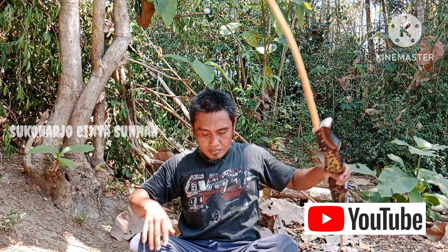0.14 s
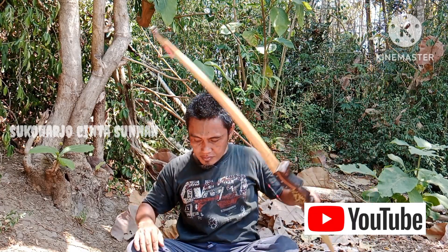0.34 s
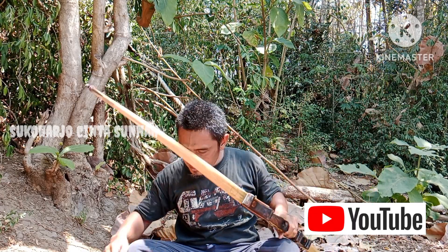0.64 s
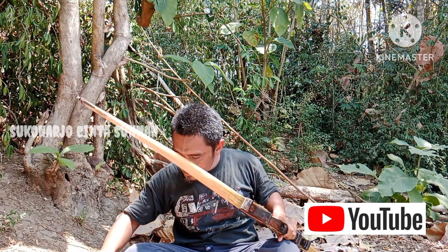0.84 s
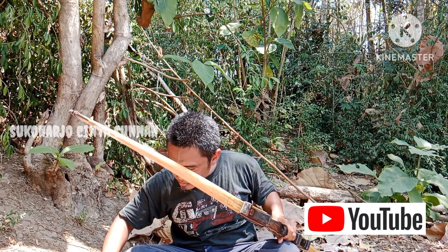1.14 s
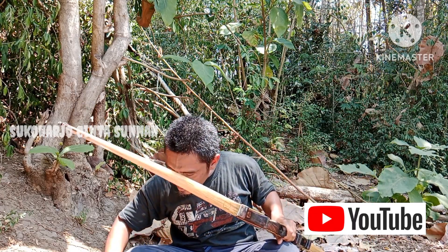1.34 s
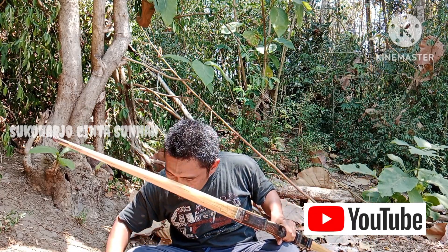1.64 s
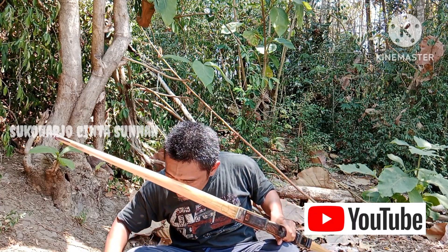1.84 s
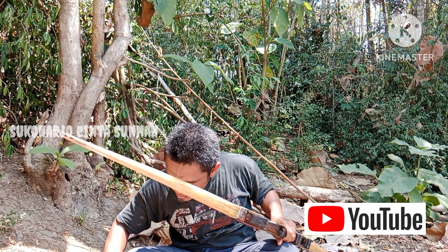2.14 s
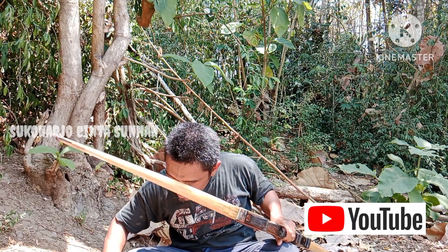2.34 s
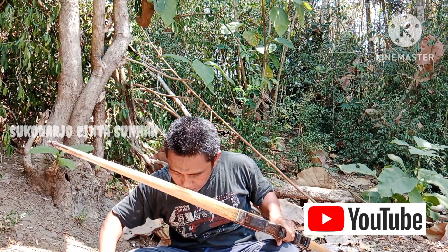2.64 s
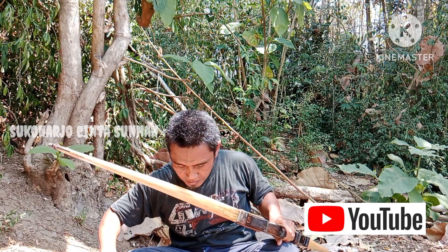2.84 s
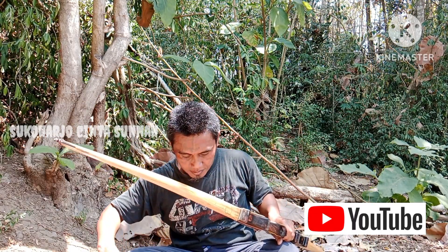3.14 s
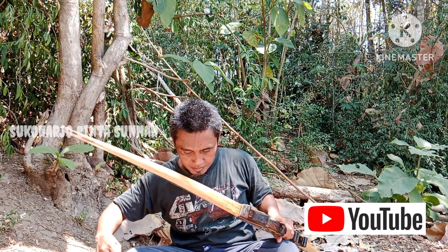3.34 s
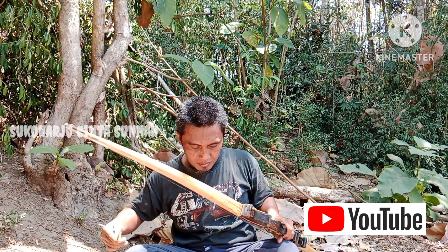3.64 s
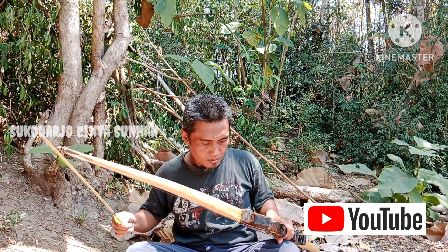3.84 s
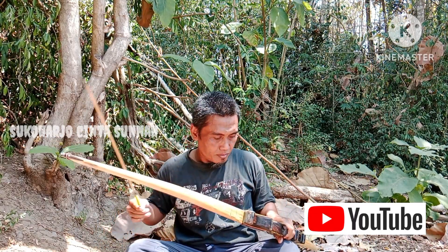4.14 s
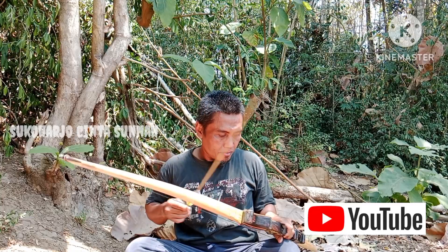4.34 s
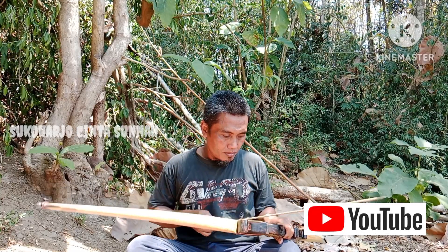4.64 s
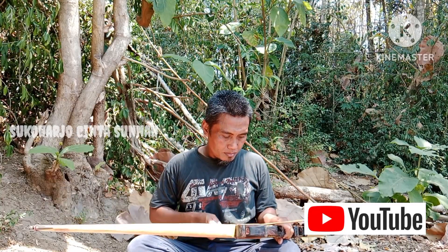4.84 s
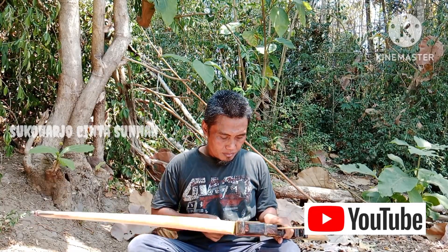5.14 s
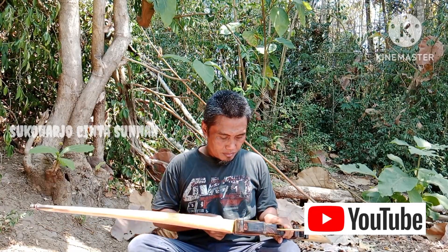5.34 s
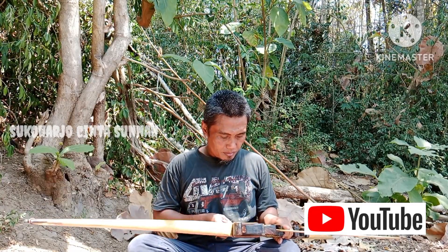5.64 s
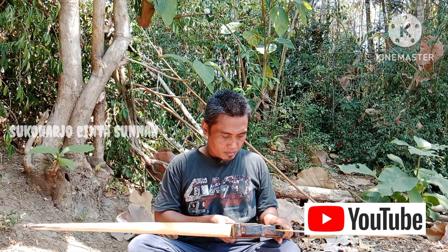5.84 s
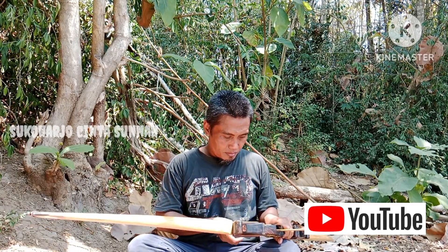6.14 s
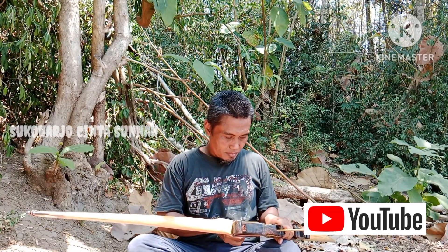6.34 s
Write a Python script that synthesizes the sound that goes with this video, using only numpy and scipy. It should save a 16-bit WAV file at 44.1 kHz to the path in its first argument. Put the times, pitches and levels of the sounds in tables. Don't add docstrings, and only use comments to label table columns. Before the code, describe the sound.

In a quiet grove, an insect chirps faintly, small far taps tick and thin birds whistle. Close by, a hand rummages in dry leaves with twig clicks and soft wood knocks. A bowstring then slaps the limb in one sharp, loud crack, leaving a faint buzz. Arrow wood taps brightly along the bow, while low wind bumps the small phone microphone.

```python
import sys
import numpy as np
from scipy import signal
from scipy.fft import rfft, irfft, next_fast_len
from scipy.io import wavfile
from scipy.ndimage import uniform_filter1d, map_coordinates

SR = 44100
rng = np.random.default_rng(int(sys.argv[2]) if len(sys.argv) > 2 else 0)


def to_linear_factor(level_db):
    exponent = np.asarray(level_db, float) / 20
    return 10 ** exponent


def generate_wav(signal):
    frames = np.transpose(np.atleast_2d(signal))
    scaled = np.clip(frames, -1, 1) * 32767
    pcm = np.round(scaled).astype(np.int16)
    wavfile.write(sys.argv[1], SR, pcm)


N = 286650


def unit(x):
    return x / np.sqrt(np.mean(x ** 2) + 1e-20)


def along(points, hz):
    f, v = np.transpose(points)
    return np.interp(np.log(hz + 1), np.log(f + 1), v)


def wobble(rate, size=N):
    knots = rng.standard_normal(int(size * max(rate, 300) / SR) + 4)
    return map_coordinates(knots, [np.arange(size) * rate / SR])


def coloured(x, spectrum):
    m = next_fast_len(len(x) + 4096)
    gain = to_linear_factor(along(spectrum, np.fft.rfftfreq(m, 1 / SR)))
    return unit(irfft(rfft(x, m) * gain, m)[:len(x)])


def band(x, edges, order=4):
    return signal.sosfilt(signal.butter(order, edges, "band", fs=SR, output="sos"), x)


def add(track, s, sound):
    part = track[round(s * SR):][:len(sound)]
    part += sound[:len(part)]


def swells(rows):
    s, db, rise, fade = np.array(list(rows)).T[:, :, None]
    t = np.arange(0, N / SR, .001)
    fall = np.maximum((s - t) / abs(rise), (t - s) / abs(fade))
    power = to_linear_factor(db - 20 * fall) ** 2
    return np.interp(np.arange(N) / SR, t, np.sqrt(power.sum(axis=0)))


# pitch_hz [Hz], t60_s [s]
GROVE_ECHO = [(500, 0.57), (2000, 0.15), (5000, 0.087), (9000, 0.36), (12500, 0.47)]


def echoes(x):
    hz, t, grid = signal.stft(rng.standard_normal(size=12000), SR, nperseg=256)
    fading = to_linear_factor(-60 * t / along(GROVE_ECHO, hz)[:, None])
    tail = signal.istft(grid * fading, SR, nperseg=256)[1]
    return signal.fftconvolve(x, tail / np.linalg.norm(tail))


# pitch_hz [Hz], level_db [dB]
CRACK_COLOUR = [(350, -64.5), (700, -18), (1400, -12), (2100, -2.5), (3500, 0), (5500, -4.5), (8500, -3.5),
                (10500, -16.5), (15500, -38.5)]


def blow(modes, crack_db, crack_t60, wet_db, rise=0.000575, colour=CRACK_COLOUR):
    t = np.arange(SR // 8) / SR
    hz, width, db = np.transpose(modes)[:, :, None]
    width = np.clip(width, 22, 900)
    strength = width * to_linear_factor(db + 1.5 * rng.standard_normal(hz.shape))
    high = np.minimum(hz / 3500, 1) ** 2
    strength = strength * (1 + 0.64 * high * np.exp(-t / 0.002))
    knots = rng.standard_normal((len(hz), 32))
    knot_times = np.linspace(0, t[-1], 32)
    flutter = 0.38 * high * np.array([np.interp(t, knot_times, row) for row in knots])
    decay = np.exp(-np.pi * width * t + flutter)
    ring = np.sum(strength * decay * np.sin(2 * np.pi * hz * t), axis=0)
    crack = to_linear_factor(crack_db - 60 * t / crack_t60) * coloured(rng.standard_normal(len(t)), colour)
    direct = (ring / np.abs(ring).max() + crack) * (1 - np.exp(-t / rise))
    out = to_linear_factor(wet_db) * echoes(direct)
    add(out, 0, direct)
    return out


def scuff(t60, colour):
    t = np.arange(SR // 4) / SR
    spectrum = rfft(coloured(rng.standard_normal(len(t)), colour))
    streak_db = 8 * np.minimum(wobble(SR / 40, len(spectrum)), 1)
    return to_linear_factor(-60 * t / t60) * unit(irfft(spectrum * to_linear_factor(streak_db), len(t)))


# pitch_hz [Hz], level_db [dB per Hz]
HUSH_COLOUR = [(88, -28.5), (150, -1), (341, -10.5), (1450, -18.5), (2140, -23), (5150, -28.5),
               (7320, -34.5), (8230, -28), (10200, -42.5), (15300, -43.5), (16000, -62.5)]
# pitch_hz [Hz], level_db [dB]
DEEP_COLOUR = [(25, -28.5), (42, -4.5), (60, 3.5), (85, 0.5), (120, -25)]
# pitch_hz [Hz], level_db [dB]
UPPER_COLOUR = [(60, -29), (95, 1.5), (140, -4), (200, -17), (350, -38.5)]
# peak_s [s], deep_db [dB], upper_db [dB], fade_s [s over 20 dB], signs ignored
GUST_EVENTS = [(0.056, -46.5, -70, -0.05), (0.271, -54, -64, -0.5), (0.38, -56.5, -71.5, 0.23),
               (0.426, -39.5, -54.5, -0.005), (1.0, -69, -73.5, 0.62), (1.38, -59.5, -66.5, 0.18),
               (1.655, -54.5, -75.5, 0.0438), (1.8, -67.5, -66, 0.09), (2.045, -38, -45.5, 0.0195),
               (2.3, -66.5, -58, 0.1), (2.418, -43.5, -52, 0.0512), (2.59, -83, -61.5, 0.47),
               (2.885, -47.5, -63.5, 0.04), (3.161, -44, -46.5, 0.1649), (3.205, -58, -67, -0.1157),
               (3.7, -62.5, -60.5, 0.14), (3.9, -87.5, -61.5, 0.625), (4.76, -53, -68.5, 0.1566),
               (4.88, -56.5, -58, 0.2248), (5.11, -50, -51, 0.2066), (5.16, -51, -68, 0.1051),
               (5.36, -48.5, -53.5, 0.047), (5.469, -48.5, -60.5, 0.0753), (5.58, -51, -65.5, 0.12),
               (5.702, -39, -42.5, 0.0615), (5.88, -49, -52.5, 0.14), (5.959, -50, -50.5, 0.1034),
               (6.045, -48, -61, 0.13), (6.186, -41.5, -47, 0.03), (6.415, -44, -74.5, 0.0647)]
# start_s [s], peak_db [dB]
SNAP_EVENTS = [
    (3.9243, -26),
    (3.9262, -15),
    (3.9304, -8),
]


def wind():
    s, deep_db, upper_db, fade = np.transpose(GUST_EVENTS)
    rise = 0.6803 * fade
    since = np.arange(N) / SR - SNAP_EVENTS[-1][0]
    duck_db = -12 * (since > 0) * np.exp(-(since / 0.59) ** 2)

    def level(db, calm_db):
        calm = to_linear_factor(calm_db + duck_db + 3.5 * wobble(6.4))
        return np.hypot(swells(zip(s, db, rise, fade)), calm)

    def eddies(spectrum):
        noise = coloured(rng.standard_normal(N), spectrum)
        return np.cos(np.angle(signal.hilbert(noise)))

    buffet = to_linear_factor(7) * level(deep_db, calm_db=-77) * eddies(DEEP_COLOUR)
    buffet += to_linear_factor(2.5) * level(upper_db, calm_db=-71) * eddies(UPPER_COLOUR)
    breeze_db = .5 * wobble(3) + .5 * wobble(15)
    hush = to_linear_factor(-71 + breeze_db) * coloured(rng.standard_normal(N), HUSH_COLOUR)
    return band(buffet, (38, 172.75), order=3) + hush


# start_s [s], peak_db [dB], length_s [s], pitch_hz [Hz]
INSECT_CHIRPS = [(0.0054, -67, 0.0277, 3440), (0.0164, -62.5, 0.0133, 3468), (0.051, -69, 0.0246, 3450),
                 (0.097, -68.5, 0.0148, 3406), (0.1766, -58.5, 0.0069, 3426), (0.2025, -54.5, 0.0038, 3429),
                 (0.23, -58, 0.0148, 3382), (0.274, -72.5, 0.02, 3460), (0.3024, -64.5, 0.0116, 3414),
                 (0.387, -54.5, 0.0075, 3425), (0.411, -57.5, 0.0063, 3444), (0.423, -65.5, 0.0107, 3307),
                 (0.4718, -70, 0.0175, 3492)]


def insect():
    out, t = np.zeros(N), np.arange(SR // 10) / SR
    for s, db, length, hz in INSECT_CHIRPS:
        fade_db = -60 * np.clip(t - length, 0, None) / 0.045
        swell = np.clip(t / 0.0023, 0, 1) * to_linear_factor(fade_db)
        add(out, s - .002, to_linear_factor(db) * swell * np.sin(2 * np.pi * hz * t))
    return out


def note(s, first_hz, last_hz, db, length):
    attack_s, release_s = .008, 0.0477
    end = s + length
    return [(s - attack_s, first_hz, db - 20), (s, first_hz, db),
            (end, last_hz, db), (end + release_s, last_hz, db - 20)]


def whistle(rows, smear_hz, waver_hz):
    s, hz, db = np.transpose(rows)
    t = np.arange(s[0], s[-1], 1 / SR)
    size = len(t) // 4096 * 4096 + 4096

    def chance(rate):
        return wobble(rate, size)[:len(t)]

    echo = 0.516 + chance(smear_hz) + 1j * chance(smear_hz)
    turns = np.cumsum(np.interp(t, s, hz) + waver_hz * chance(24.25)) / SR
    return s[0], to_linear_factor(np.interp(t, s, db)) * np.real(echo * np.exp(2j * np.pi * turns))


# start_s [s], first_pitch_hz [Hz], last_pitch_hz [Hz], level_db [dB], length_s [s]
BIRD_NOTES = [(0.099, 2486, 2445, -72, 0.084), (0.169, 2389, 2300, -71, 0.109),
              (0.188, 7317, 7450, -77, 0.204), (0.193, 4190, 4267, -73, 0.055),
              (0.249, 1924, 1925, -74, 0.188), (0.286, 1271, 1260, -76, 0.037),
              (0.299, 1489, 1398, -73.5, 0.0178), (0.335, 1486, 1523, -70.5, 0.044),
              (0.419, 2650, 2617, -74.5, 0.0256), (0.431, 3000, 2950, -78.5, 0.05),
              (0.323, 2375, 2404, -72.5, 0.129), (0.384, 8540, 8400, -75, 0.038),
              (0.461, 1620, 1540, -69, 0.0381), (.53, 1560, 1535, -78.5, 0.054),
              (0.999, 3400, 3250, -78, .03), (1.035, 3154, 3040, -74, 0.0402),
              (1.154, 2680, 2734, -57.5, 0.034), (1.178, 2818, 2900, -62.5, 0.051),
              (1.25, 2774, 2795, -59, 0.044), (1.293, 2967, 2900, -55, 0.0453),
              (1.31, 2670, 2580, -63, 0.0172), (1.359, 2900, 2900, -62, 0.0652),
              (1.467, 2900, 2900, -73, 0.013), (4.739, 2052, 1911, -69.5, 0.093),
              (4.749, 1650, 1700, -72, 0.078), (4.866, 1757, 1770, -68, 0.0246),
              (6.22, 2878, 3250, -70, 0.0495), (6.373, 2676, 2640, -61, 0.00695),
              (6.397, 2651, 2790, -59.5, 0.0258), (6.49, 2690, 2760, -66.5, 0.0101)]
# start_s [s], level_db [dB], length_s [s]
COO_NOTES = [
    (0.991, -71, 0.04),
    (1.09, -81.5, 0.026),
    (1.161, -76.5, 0.043),
    (1.482, -78, 0.0345),
    (2.075, -70.5, 0.0496),
    (2.18, -70, 0.025),
    (2.484, -77.5, 0.01474),
    (2.72, -71.5, 0.0353),
    (2.98, -77.5, 0.022),
]


def birds():
    out = np.zeros(N)
    for row in BIRD_NOTES:
        add(out, *whistle(note(*row), smear_hz=210, waver_hz=40))
    for s, db, length in COO_NOTES:
        add(out, *whistle(note(s, 1465, 1465, db, length), smear_hz=79.9, waver_hz=14.4))
    return 0.698 * out


# start_s [s], peak_db [dB]
TICK_EVENTS = [
    (0.099, -54.5),
    (0.239, -53),
    (0.4239, -53),
    (0.615, -57),
    (0.6997, -63),
    (0.857, -57),
    (0.998, -58.5),
    (1.245, -56),
    (1.3925, -58),
    (1.6484, -56),
]
# pitch_hz [Hz], width_hz [Hz], level_db [dB]
TICK_MODES = [(5634.2, 14, -1), (5940, 184, -12.5), (6655, 29, 1.5), (8100, 27, -27), (8000, 78, -16)]


def far_ticks():
    out = np.zeros(N)
    for s, db in TICK_EVENTS:
        add(out, s, to_linear_factor(db) * blow(TICK_MODES, crack_db=-14.5, crack_t60=0.07, wet_db=-9))
    return out


def crackle(count):
    start, pitch, size = rng.random((count, 3)).T
    t = np.arange(800) / SR
    hz = 2000 * 7 ** pitch[:, None]
    loudness = to_linear_factor(-2.5 * np.log(size + 0.03))[:, None]
    rings = loudness * np.sin(2 * np.pi * hz * t) * to_linear_factor(-60 * t / .07)
    where = (start * N).astype(int)[:, None] + np.arange(len(t))
    return unit(np.bincount(where.ravel(), rings.ravel())[:N])


# pitch_hz [Hz], level_db [dB]
LEAF_COLOUR = [(880, -41.5), (1500, -6.5), (2060, -8), (2230, -14), (3060, -2.5), (5330, -3), (7100, 3),
               (10500, -10), (14800, -21), (16000, -15.5)]
# peak_s [s], level_db [dB], rise_s [s over 20 dB], fade_s [s over 20 dB], signs ignored
RUMMAGE_EVENTS = [(1.564, -71.5, -0.1954, 0.12), (1.745, -67.5, 0.0154, 0.0748), (1.826, -55, 0.02, 0.0857),
                  (1.85, -52, 0.0216, .07), (1.905, -58.5, 0.0891, 0.0356), (1.97, -67, -0.17, 0.0873),
                  (2.17, -74.5, 0.1, -0.14), (2.422, -66, 0.0538, -0.104), (3.01, -85, 0.17, 0.1),
                  (3.095, -86, 0.19, -0.02), (3.275, -82.5, -0.1954, 0.26), (3.456, -80, -0.33, 0.29),
                  (4.04, -82.5, 0.1485, -0.0745), (4.275, -79, 0.12, -0.42), (4.4, -83.5, 0.12, 0.1),
                  (4.55, -78.5, -0.1635, 0.1588), (4.65, -74, 0.23, 0.26), (4.76, -74, 0.01, 0.19),
                  (4.885, -63.5, 0.0626, -0.1071), (4.96, -74.5, 0.06, 0.0346), (5.04, -81, 0.25, 0.16),
                  (6.24, -82.5, 0.79, -1.5), (6.325, -81.5, 0.44, -3.3)]
# peak_s [s], level_db [dB], rise_s [s over 20 dB], fade_s
# [s over 20 dB], signs ignored
DRAG_EVENTS = [
    (1.868, -53, 0.0911, 0.0845),
    (1.998, -54.5, 0.0034, 0.012),
    (2.018, -49, 0.0376, 0.0069),
    (2.23, -48.5, 0.0137, 0.0418),
    (2.4, -70, -0.06, 0.0741),
    (3.948, -53, 0.0933, -0.0407),
]
# pitch_hz [Hz], level_db [dB]
DRAG_COLOUR = [(400, -14), (600, -11), (730, 4.5), (900, -20), (1250, -4), (1700, -16), (2600, -17),
               (4000, -32)]
# start_s [s], peak_db [dB], pitch_hz [Hz]
TWIG_CLICKS = [(1.5593, -46.5, 5280), (1.793, -51.5, 4700), (1.8214, -44.5, 6450), (1.8313, -33, 3146),
               (1.8447, -31, 3104), (1.902, -38.5, 2684), (1.9671, -35, 7850), (2.02, -41.5, 2580),
               (2.029, -44.5, 3238), (2.114, -52, 3335), (2.4307, -43.5, 8180), (2.617, -50.5, 5114),
               (3.2662, -61, 8470), (3.3587, -53.5, 3500), (3.4535, -52.5, 8590), (4.264, -52.5, 8513),
               (4.538, -60.5, 8747), (4.5971, -49.5, 4255)]


def leaves():
    grains = coloured(crackle(count=5000) + .95 * rng.standard_normal(N), LEAF_COLOUR)
    out = swells(RUMMAGE_EVENTS) * grains
    scrape = coloured(rng.standard_normal(N) * to_linear_factor(1.7 * wobble(70)), DRAG_COLOUR)
    out += swells(DRAG_EVENTS) * scrape
    for s, db, hz in TWIG_CLICKS:
        modes = [(hz, 300, 0), (min(hz * 1.529, 9500), 400, -6)]
        click = blow(modes, crack_db=-12.5, crack_t60=0.00693, wet_db=-9, colour=LEAF_COLOUR)
        add(out, s, to_linear_factor(db) * click)
    return out


# start_s [s], peak_db [dB], bounce_db [dB], crack_db [dB], rise_s [s]
KNOCK_EVENTS = [(1.71, -42.5, -5.5, -6.5, 0.00066), (1.998, -41, 2, -14, 0.00162),
                (2.225, -35.5, -8, -15, 0.00155), (2.391, -38.5, -18, -13, 0.00176),
                (4.102, -44, -0.5, -17, 0.000877), (4.694, -27.5, -3, -9.5, 0.0015),
                (4.898, -25, -10, -5.5, 0.000727), (5.061, -22, -9.5, -9.5, 0.001205),
                (5.214, -33.5, -2, -10.5, 0.000424), (5.341, -28.5, -6.5, -6.5, 0.00113),
                (5.427, -36, -10, -23.5, 0.00062), (5.49, -44.5, -4.5, -32.5, 0.0008)]


def approach():
    out, t = np.zeros(N), np.arange(SR // 50) / SR
    for s, db, *_ in KNOCK_EVENTS + [(SNAP_EVENTS[0][0], -34)]:
        swell = to_linear_factor(db - 29.5 - 60 * t[::-1] / 0.01874)
        add(out, s - t[-1], swell * coloured(rng.standard_normal(len(t)), LEAF_COLOUR))
    return out


# pitch_hz [Hz], width_hz [Hz], level_db [dB]
SEATED_MODES = [(1422, 23, -27), (1630, 16, -9), (1981.8, 30.2, 5), (2580, 21.16, -13.5),
                (2894, 22.13, -12.5), (3608, 42.28, -11.5), (4326, 35.3, -16), (5220, 25.66, -19),
                (6550, 55, -21), (8270, 57, -26.5)]


def seated(k):
    dulling_db, main_hz = -3, 1950
    return [(hz, width, db + k * dulling_db * abs(np.log2(hz / main_hz))) for hz, width, db in SEATED_MODES]


# pitch_hz [Hz], width_hz [Hz], level_db [dB]
LIMB_MODES = [
    [(2476.6, 37.1, -13), (4850, 32.6, -4.5), (5970, 31.76, 4.5), (8400, 26, 5.5), (9000, 26, -3.5)],
    [(733.6, 39.4, -1), (1271.5, 30, -6.5), (2522, 74, -17.5), (3101, 39, -12), (4380, 23.4, -17)],
    [(679.6, 65.3, 0.5), (3250, 36, -6), (4038, 61, -6.5), (4272, 24, -7.5), (5600, 18.58, -14)],
    [(1259, 62, -5), (2068.1, 19.1, -5), (2680, 108, -1), (3923, 61.9, 2)],
    [(3585, 82, -0.5), (4392.8, 114, 6), (7030, 29, -13.5), (7996, 46, -13)],
]
# pitch_hz [Hz], width_hz [Hz], level_db [dB]
ARROW_MODES = [
    [(1157, 36.6, 3), (1406, 29.6, -1.5), (2705, 35, -0.5), (3633, 40, -6.5), (3887, 41, -3.5),
     (4634, 41, -3), (5700, 29.7, -16.5), (6700, 82, -7.5), (7570, 21, -20.5), (8400, 28.93, -20)],
    [(1401, 15, -2), (2015, 46, 6), (2363, 21, -0.5), (2900, 17.1, 3), (3714, 40, 1.5), (4307, 69, 7.5),
     (4620, 51, 2.5), (5700, 64, -16.5), (6180, 38.04, -20), (8173, 36, -19.5), (8590, 20.9, 3)],
    [(1631, 30, -7.5), (1996, 41, -3.5), (2050, 30, -3.5), (2966.7, 28.59, 3.5), (3657, 29.7, -1.5),
     (4040, 41, -6), (6710, 49.4, -8), (7971.3, 47.5, -17.5)],
]
# pitch_hz [Hz], level_db [dB]
SCUFF_COLOUR = [(600, -33), (1200, -3.5), (2500, 7), (5000, 1), (8500, 0), (11000, -23.5), (15000, -20),
                (16500, -40)]
SCUFF_LEVELS = [-36.5, -21, -24.5, -25.5, -40, -19.5, -23.5, -26, -19.5, -23, -31, -33]


def shaft_taps():
    out = np.zeros(N)
    mode_sets = LIMB_MODES + ARROW_MODES + [seated(k) for k in range(4)]
    for (s, db, bounce_db, crack_db, rise), modes in zip(KNOCK_EVENTS, mode_sets):
        colour = LEAF_COLOUR if s < 4.5 else CRACK_COLOUR
        for lag, gain_db in (0, db), (.0073, db + bounce_db):
            hit = blow(modes, crack_db, 0.02552, wet_db=-15.5, rise=rise, colour=colour)
            add(out, s + lag - .0007, to_linear_factor(gain_db) * hit)
    for (s, db, *_), under_db in zip(KNOCK_EVENTS, SCUFF_LEVELS):
        add(out, s, to_linear_factor(db + under_db) * scuff(0.1384, SCUFF_COLOUR))
    return out


# start_s [s], peak_db [dB]
TWIG_BREAKS = [
    (1.8216, -46.5),
    (1.8318, -46.5),
    (1.8444, -35),
    (1.854, -46),
    (1.866, -52.5),
    (1.915, -52),
]


def twigs():
    out, t = np.zeros(N), np.arange(SR // 20) / SR
    for s, db in TWIG_BREAKS:
        crack = coloured(rng.standard_normal(len(t)), LEAF_COLOUR)
        add(out, s - .0005, to_linear_factor(db - 5 - 60 * t / .018) * crack)
    return out


# start_s [s], peak_db [dB], pitch_hz [Hz], t60_s [s]
PING_EVENTS = [(1.952, -52.5, 7570, 0.041), (2.030, -53, 8490, .04), (2.076, -69.5, 3740, 0.043),
               (2.111, -66.5, 6690, 0.063), (2.141, -68, 7000, 0.044), (2.149, -67, 7000, 0.0743),
               (3.038, -76.5, 9980, 0.083), (3.088, -69.5, 9200, 0.059), (3.090, -78, 10100, 0.066),
               (3.095, -69.5, 8180, 0.067), (3.266, -64, 8490, .08), (3.296, -63, 8560, 0.05874),
               (3.297, -72, 7300, 0.053), (3.355, -73, 9400, .15), (3.356, -69.5, 8200, 0.0959),
               (3.357, -77, 13500, .05), (3.360, -60, 3376, 0.103), (3.454, -62, 8980, 0.107),
               (4.178, -70.5, 7930, 0.136), (4.234, -69, 8510, 0.082), (4.263, -67, 9670, .05),
               (4.274, -67.5, 8400, 0.115), (4.370, -72, 6103, 0.068), (4.404, -68.5, 8650, 0.054),
               (4.476, -70.5, 8290, 0.086), (4.478, -72.5, 14040, .02), (4.538, -71, 13500, .03),
               (4.539, -69, 8800, .08), (4.548, -65.5, 8600, 0.153), (4.549, -70, 7109, 0.078),
               (4.596, -66.5, 13130, 0.029), (4.598, -70, 11540, 0.042), (4.599, -65.5, 5274, 0.14),
               (4.618, -65.5, 8760, 0.135), (4.668, -70, 11490, 0.093), (4.757, -72, 14000, .03),
               (4.770, -70, 13500, .02), (4.795, -69, 13000, .02), (4.816, -65, 4950, 0.112),
               (4.840, -60, 9140, 0.051), (4.841, -71.5, 13500, .02), (4.857, -61.5, 8900, 0.106),
               (4.880, -57, 6500, 0.096)]
# start_s [s], peak_db [dB], pitch_hz [Hz], t60_s [s]
STRING_BRUSHES = [
    (3.99, -63.5, 3676, .15),
    (4.005, -59, 2495, 0.114),
    (4.03, -60.5, 5150, 0.194),
    (4.035, -61.5, 4327, 0.18),
    (4.06, -67, 3650, 0.22),
    (4.102, -57.5, 9010, .06),
    (4.118, -66, 5840, 0.103),
    (4.135, -63, 3695, 0.104),
    (4.14, -66, 1788, 0.11),
    (4.15, -66, 4535, 0.082),
]


def pings():
    out, t = np.zeros(N), np.arange(SR // 10) / SR
    ratchet = [(2.143 + k * .0075, -60.5, 12450 + 700 * (k % 3), .008) for k in range(8)]
    for s, db, hz, t60 in PING_EVENTS + STRING_BRUSHES + ratchet:
        noise = rng.standard_normal((3, len(t)))
        waver = unit(uniform_filter1d(uniform_filter1d(noise[:2], size=90), size=90))
        tone = (0.66 + waver[0] + 1j * waver[1]) * np.exp(2j * np.pi * hz * t)
        ring = np.real(tone) * to_linear_factor(-60 * t / t60)
        tick = .2 * np.diff(noise[2], prepend=0) * to_linear_factor(-60 * t / .006)
        add(out, s - .0005, to_linear_factor(db - 6.5) * (ring + tick) * (1 - np.exp(-t / 0.000597)))
    return out


# centre_s [s], level_db [dB], pitch_hz [Hz], half_width_s [s]
THUMP_EVENTS = [
    (2.029, -32, 98.3, .007),
    (2.024, -50.5, 421, 0.0052),
    (2.029, -44.5, 207.4, 0.0054),
    (2.047, -37, 91, 0.0075),
    (2.419, -37.5, 89.8, 0.00905),
    (3.164, -30.5, 110.8, 0.00953),
    (3.17, -34, 69, .02),
    (5.704, -34.5, 96, 0.011),
]


def thumps():
    out, t = np.zeros(N), np.arange(N) / SR
    for s, db, hz, width in THUMP_EVENTS:
        out += to_linear_factor(db) * np.exp(-((t - s) / width) ** 2) * np.cos(2 * np.pi * hz * (t - s))
    return out


# pitch_hz [Hz], width_hz [Hz], level_db [dB]
BOW_MODES = [(799, 9.8, -7.5), (991, 12, -16), (1276.5, 12, -14), (1606, 20, -17.5), (1791, 30, -16.5),
             (2392.4, 31, -2), (2540, 32, -12), (3018, 62, -5.5), (3083, 22, -10.5), (3736.1, 62, 0),
             (3946, 71, -2.5), (4354.1, 42, -9.5), (4600, 60, -14.5), (4810, 59.14, -14.5),
             (5063, 52, -4.5), (7049.8, 99, -14), (7706, 44, -14.5), (8072.5, 60, -15), (8630, 61, -11)]
# pitch_hz [Hz], level_db [dB]
SLAP_COLOUR = [(350, -59.5), (600, -26), (1200, -15), (2000, -15), (3000, -6), (4000, 0), (6000, -14),
               (8300, -8), (10500, -22.5), (14000, -28.5), (15800, -45)]
# pitch_hz [Hz], level_db [dB]
BUZZ_COLOUR = [(600, -22), (1000, -9.5), (2400, -4), (3000, -8), (3700, 0), (4400, -2), (5200, -1.5),
               (6200, -7), (8500, -5), (10500, -20), (15500, -34)]


def string_snap():
    out = np.zeros(N)
    for s, db in SNAP_EVENTS:
        slap = blow(BOW_MODES, crack_db=-14, crack_t60=0.01897, wet_db=-19, rise=0.00028, colour=SLAP_COLOUR)
        add(out, s, to_linear_factor(db) * slap)
    add(out, s, to_linear_factor(-45) * scuff(0.3, BUZZ_COLOUR))
    return 2.2 * band(out, (900, 15000), order=2)


def scene():
    hits = far_ticks() + leaves() + approach() + shaft_taps() + twigs() + pings() + string_snap()
    calls = insect() + birds()
    grove = wind() + calls + to_linear_factor(-5) * echoes(calls)[:N] + thumps()
    return (band(hits, (350, 17500)) + grove)[None]


def band_limit(x):
    return signal.sosfilt(signal.butter(12, 15600, fs=SR, output="sos"), x)


def record(dry):
    return band_limit(dry)


dry = scene()
out = record(dry)
generate_wav(out)
```